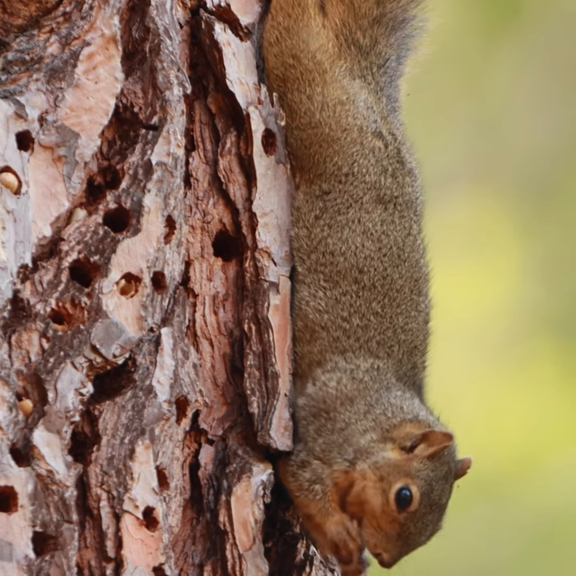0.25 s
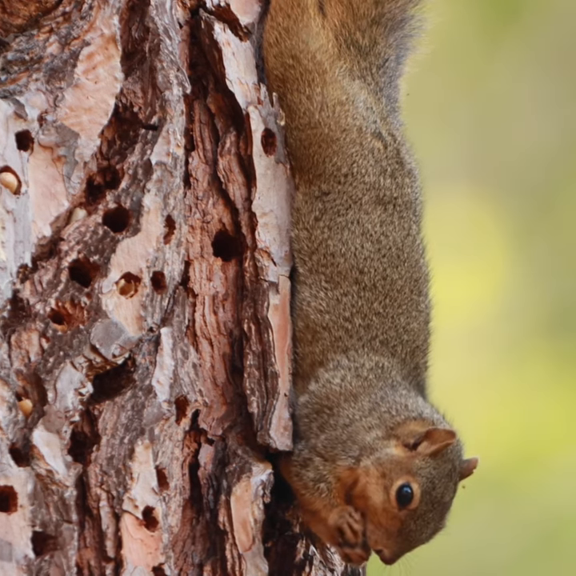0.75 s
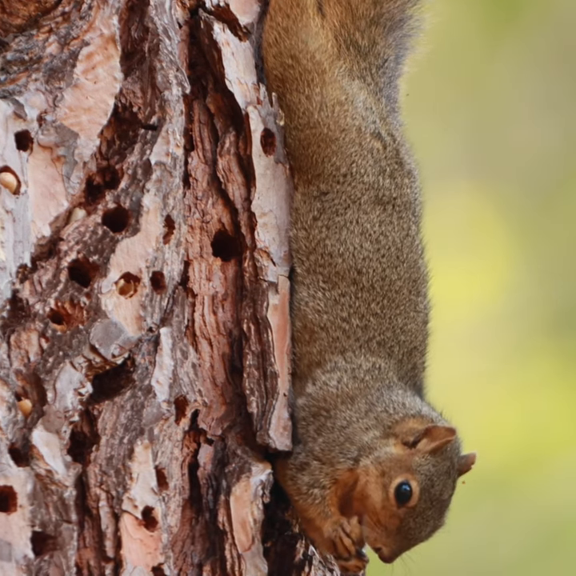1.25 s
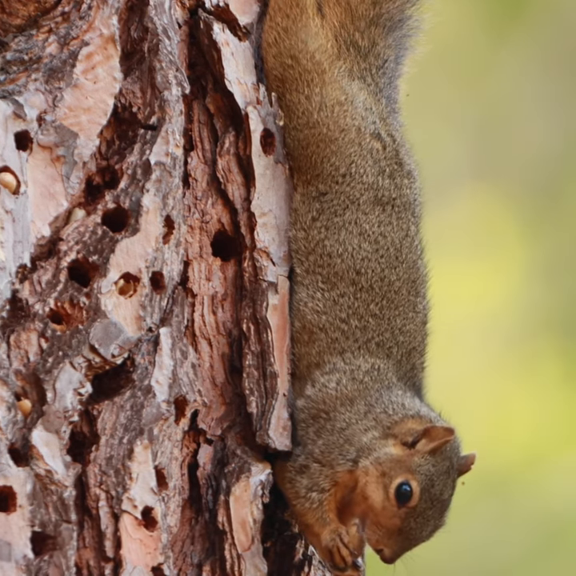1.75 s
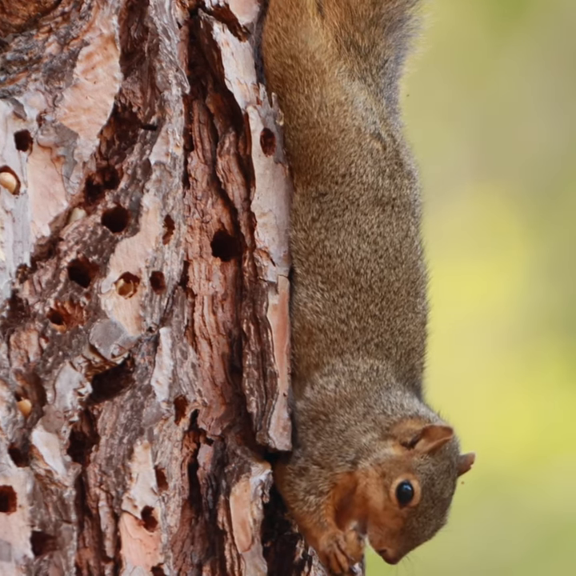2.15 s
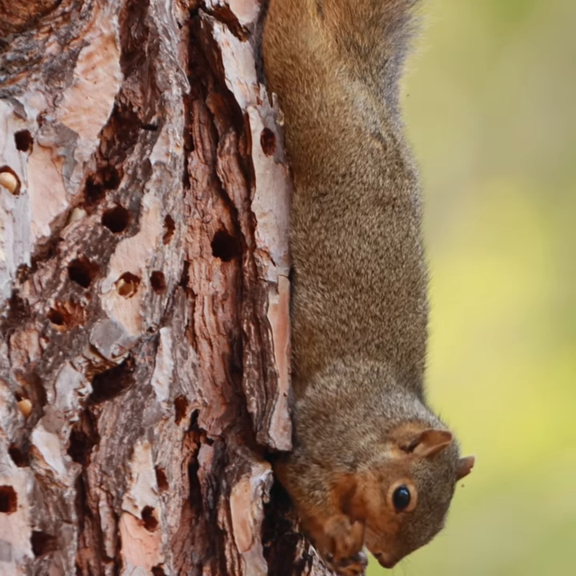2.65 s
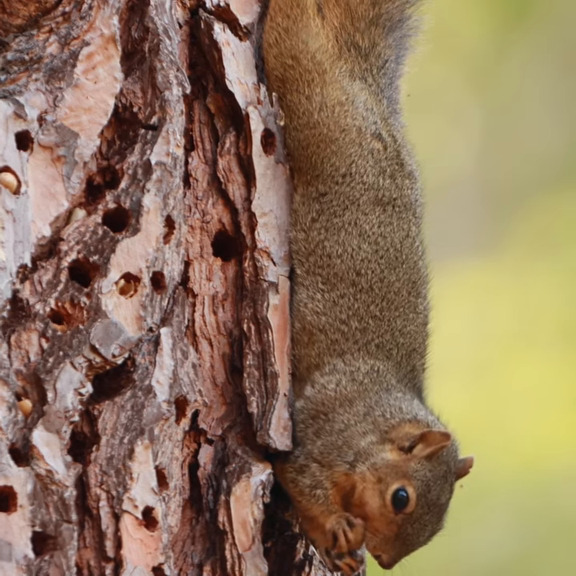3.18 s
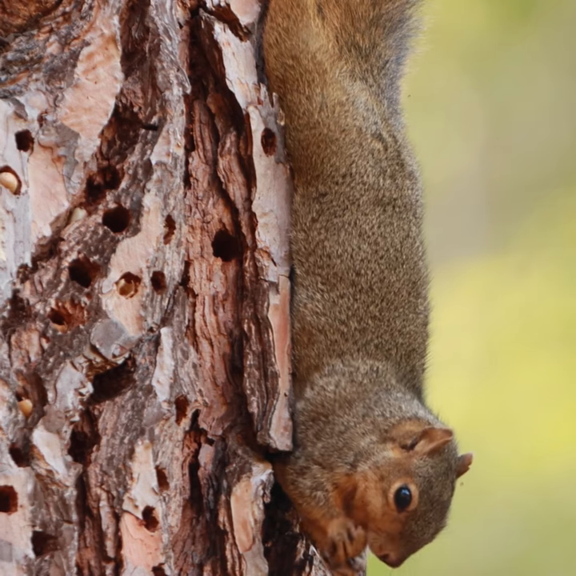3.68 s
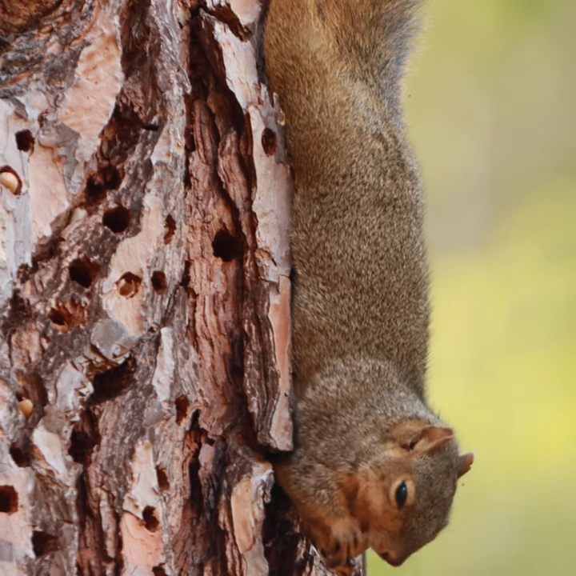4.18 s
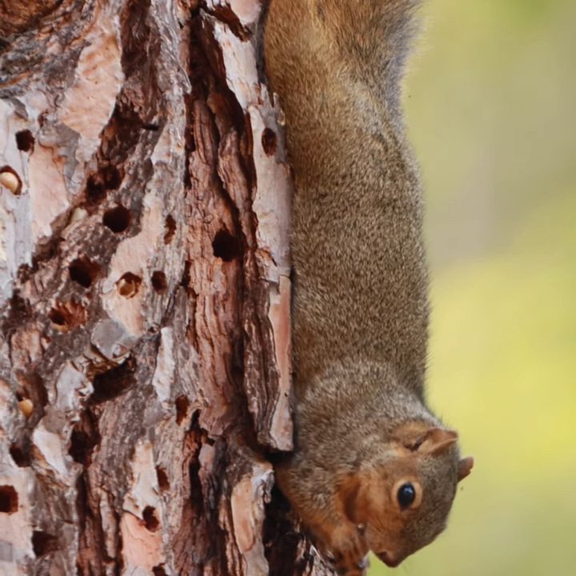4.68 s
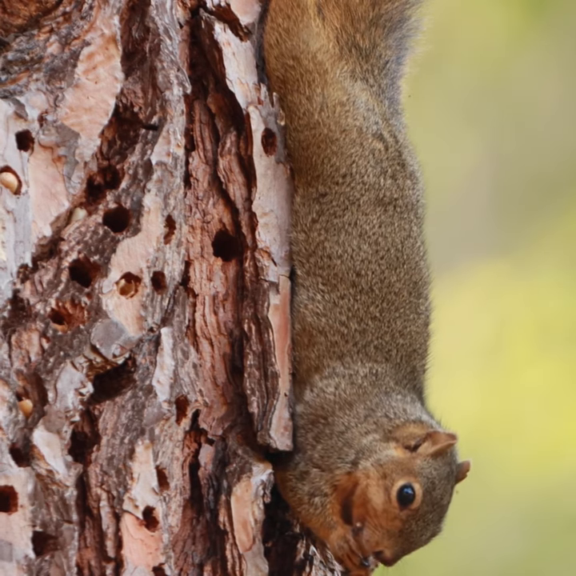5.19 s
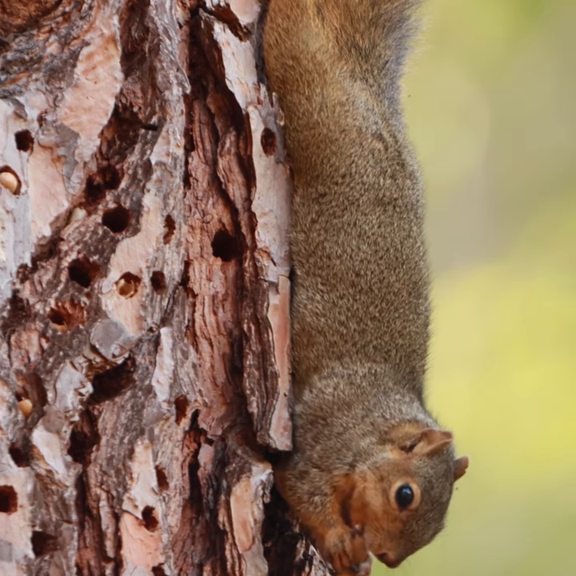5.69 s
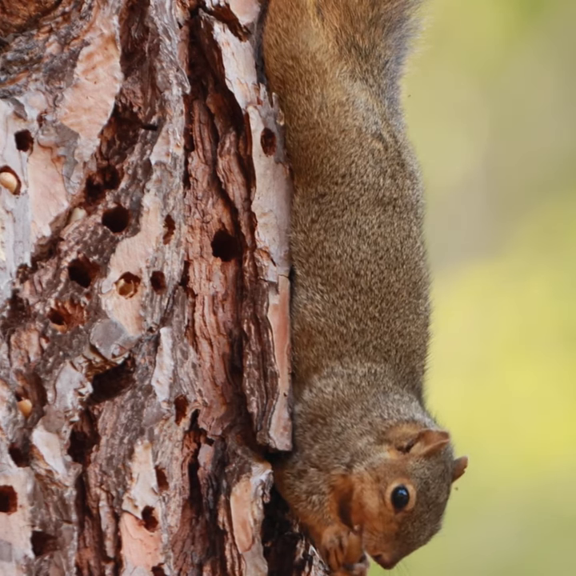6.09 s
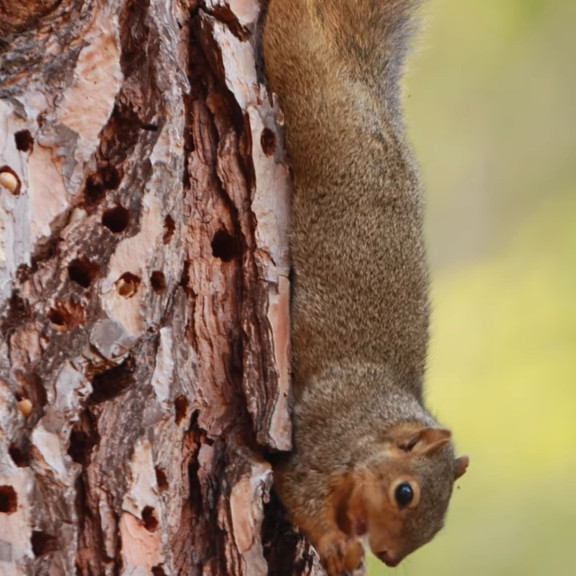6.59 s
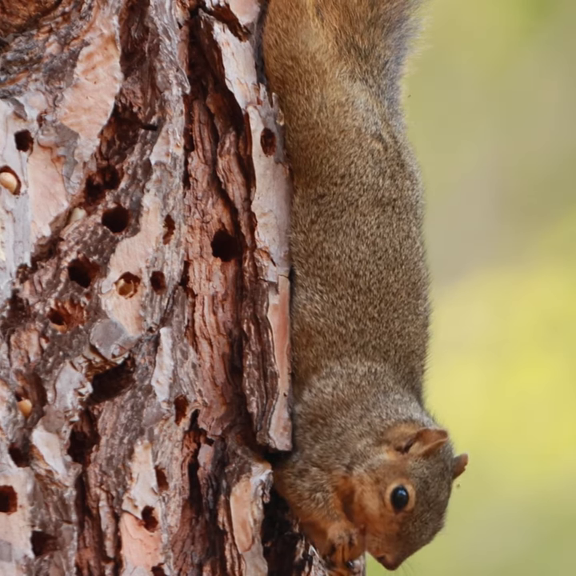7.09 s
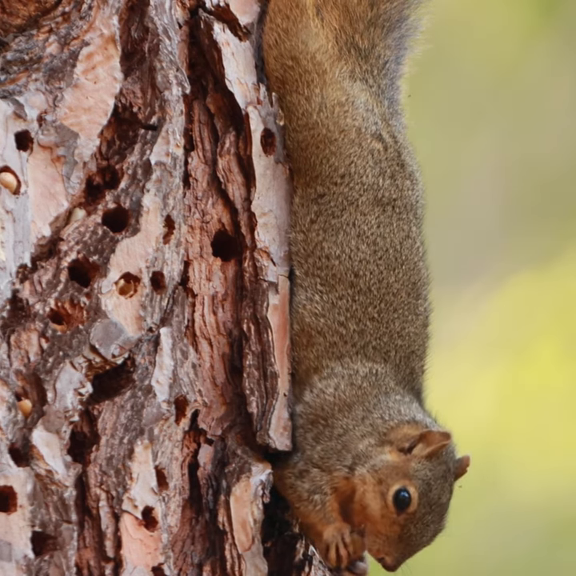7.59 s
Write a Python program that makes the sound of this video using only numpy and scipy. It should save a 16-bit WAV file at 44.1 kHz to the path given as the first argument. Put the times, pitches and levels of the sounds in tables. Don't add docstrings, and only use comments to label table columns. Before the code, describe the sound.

A nearby woodpecker gives five harsh rolling churrs among trees, with fainter churring from afar, a soft cricket chirp and low distant traffic rumble.

```python
import sys
import numpy as np
from scipy import signal
from scipy.fft import rfft, irfft, next_fast_len
from scipy.io import wavfile
from scipy.ndimage import uniform_filter1d

SR = 44100
rng = np.random.default_rng(int(sys.argv[2]) if len(sys.argv) > 2 else 0)


def store_wav(level_fs):
    pcm = np.round(np.clip(np.atleast_2d(level_fs), -1, 1) * 32767)
    wavfile.write(sys.argv[1], SR, pcm.T.astype(np.int16))


def volts_from_db(level):
    exponent = np.asarray(level, float) / 20
    return 10 ** exponent


N = 345744


def near_bird():
    # [opening note t/s, first roll t/s, last roll t/s, closing note t/s]
    call_times = [
        (3.378, 3.402, 3.652, 3.69),
        (4.609, 4.662, 4.882, 4.913),
        (5.038, 5.067, 5.177, 5.213),
        (5.337, 5.364, 5.476, 5.506),
        (6.766, 6.827, 7.072, 7.1),
    ]
    # [t/s, pitch f/Hz, level/dB]
    efforts = [
        [(3.378, 648, -44), (3.402, 580, -37.3), (3.457, 680, -33.3), (3.51, 725, -31.5), (3.57, 745, -28.5),
         (3.625, 700, -33), (3.69, 672, -40.6)],
        [(4.609, 580, -35.4), (4.662, 704, -30.6), (4.728, 918, -25), (4.8, 972, -24.4), (4.856, 972, -24.5),
         (4.913, 805, -29.5)],
        [(5.038, 636, -31.6), (5.067, 671, -31.3), (5.097, 775, -27.5), (5.125, 842, -27.9), (5.177, 805, -28),
         (5.213, 748, -30.9)],
        [(5.337, 644, -31.5), (5.364, 688, -30.1), (5.42, 800, -27.5), (5.476, 815, -27.8), (5.506, 770, -29.3)],
        [(6.766, 588, -34.7), (6.827, 735, -29.5), (6.912, 905, -29.3), (6.964, 965, -30), (7.016, 980, -29.5),
         (7.072, 750, -31), (7.1, 656, -39.5)],
    ]
    # [dip between rolls/dB, dip after opening/dB, swell/s]
    manners = [(-2.5, -1, .014), (-1.2, -5, .022), (-1, -8.5, .013), (-3.2, -5.5, .013), (-.6, -6.5, .019)]
    voices = [(5.5, .3, .75, .75, .72), (8.5, .05, .08, .13, .5), (8.5, .15, .08, .7, .05),
              (10, .08, .13, .08, .9), (12, 0, .08, .65, .2)]
    strains = [.05, .02, 0, .02, .17]
    # [first resonance/dB, second resonance f/Hz, its level/dB, treble/dB, left-right/dB]
    facings = [(10.5, 3530, 11.5, 8.5, -1), (10.5, 3525, 15.5, 6, -0.3), (11, 3550, 14, 5, 0),
               (9, 3540, 14.5, 10, 0), (13, 3510, 13.5, 2.5, -0.9)]
    # [f/Hz, level/dB]
    near_throat = [(900, -17.5), (1400, -1.5), (1800, -2), (2300, -1.5), (2800, 0), (3900, -10),
                   (4200, -13), (5600, -8.5), (7000, -15), (8400, -19.5), (9500, -37.5), (11800, -17),
                   (13200, -30.5), (14000, -42)]
    # [f/Hz, level/dB]
    leaves = [(1000, 12.5), (2200, 3.5), (3500, 8), (6000, 10), (12000, 6.5)]
    calls = []
    for times, effort, manner, voice, strain, facing in zip(call_times, efforts, manners, voices, strains, facings):
        rolls = near_rolls(times, effort, manner, voice, strain)
        calls.append(churr(rolls, near_throat, facing[:4], hiss_db=-64.0, lead_s=manner[2]))
    direct = sum(from_trees(call, facing[4]) for call, facing in zip(calls, facings))
    voiced = sum(calls)
    scatter = trees(voiced, t60_s=.2, level_db=-16, cut_hz=12000, gap_s=.008)
    tail = trees(coloured(voiced, leaves), t60_s=0.7, level_db=-18.5, cut_hz=8600, gap_s=0.0083)
    return volts_from_db(1.44) * direct + scatter + tail


def near_rolls(times, effort, manner, voice, strain):
    roll_s, haste = .0275, .52
    sag_growth, open_sag_pct, close_sag_pct = .4, 11, 4
    close_dip_db, pause_db_per_s = -6.5, -300
    clear = .03
    run_up_s, run_up_share, run_up_db = .02, .87, -5.5
    opening, first, last, closing = times
    dip_db, open_dip_db = manner[:2]
    sag_pct, slowing, open_rough, close_rough, carry = voice
    when, effort_hz, effort_db = np.transpose(effort)

    along = np.linspace(0, 1, round((last - first) / roll_s))
    even_hz = np.interp(first + along * (last - first), when, effort_hz)
    gaps = even_hz ** -haste * (1 + slowing * along)
    s = np.r_[opening, first, first + np.cumsum(gaps) / gaps.sum() * (last - first), closing]
    hz = np.interp(s, when, effort_hz)
    db = np.interp(s, when, effort_db)

    last_sag_pct = sag_pct * (1 + sag_growth / 2) * (1 - close_rough)
    sags_pct = np.r_[open_sag_pct, sag_pct * (1 + sag_growth * (along - .5)), last_sag_pct, close_sag_pct]
    pause_db = dip_db + pause_db_per_s * (closing - last - roll_s)
    dips_db = np.r_[open_dip_db, np.full(len(along), dip_db), pause_db, close_dip_db]
    sag_db = (db + np.append(db[1:], db[-1])) / 2 + dips_db
    k = np.arange(len(s))
    rough = clear + strain * (k / k[-1]) ** 2
    rough = rough + open_rough * carry ** k ** 2 + close_rough * carry ** k[::-1] ** 2
    rows = np.c_[s, hz, sags_pct, db, sag_db, rough]
    if first - opening > roll_s + run_up_s:
        run_db = db[1] + run_up_db
        rows[0, 4] = db[0] + open_dip_db
        run_up = (first - run_up_s, run_up_share * hz[1], 0, run_db, run_db, 2 * open_rough)
        rows = np.insert(rows, 1, run_up, axis=0)
    return rows


def churr(rolls, throat, opening, hiss_db, lead_s, fall_db=-17):
    s, hz, sag_pct, crest_db, sag_db, rough = np.transpose(rolls)
    sag_db = sag_db + .9 * np.minimum(sag_db - crest_db, 0)
    after = np.append(s[1:], s[-1] + .022)
    knots_s = np.r_[s[0] - lead_s, np.c_[s, (s + after) / 2].ravel(), after[-1]]
    low_hz = (hz + np.append(hz[1:], hz[-1])) / 2 * (1 - 1.25 * sag_pct / 100)
    knots_hz = np.r_[hz[0] * .82, np.c_[hz, low_hz].ravel(), low_hz[-1]]
    knots_db = np.r_[crest_db[0] + fall_db, np.c_[crest_db, sag_db].ravel(), sag_db[-1] + fall_db]
    start = int(knots_s[0] * SR)
    t = np.arange(start, int(knots_s[-1] * SR)) / SR
    knot = np.arange(len(knots_s))
    place = np.interp(t, knots_s, knot)
    eased = np.floor(place) + (1 - np.cos(np.pi * (place % 1))) / 2
    pitch_hz = np.interp(eased, knot, knots_hz)
    level_shape = 0.43
    level = np.interp(eased, knot, volts_from_db(knots_db / level_shape)) ** level_shape
    rough = np.clip(np.interp(t, s, rough), 0, 1)

    jitter = (.005 + .04 * rough) * drift(300, len(t))
    phase = 2 * np.pi * np.cumsum(pitch_hz * (1 + jitter)) / SR
    order = np.arange(1, 27)[:, None]
    harmonic_hz = order * pitch_hz
    treble = np.clip((harmonic_hz - 3900) / 800, 0, 1)
    upper = np.clip((harmonic_hz - 2400) / 500, 0, 1)
    climb = -.35 * upper + 0.33 * np.clip((harmonic_hz - 5000) / 3000, 0, 1)
    slid_hz = harmonic_hz * (pitch_hz / 850) ** climb
    opened = np.clip(place / 3 - .1, .25, 1)
    in_sag = (1 + np.cos(np.pi * place)) / 2
    heights_db = at_hz(throat, slid_hz) + opened * beak(slid_hz, *opening)
    heights_db = heights_db - 0.82 * in_sag * upper * (6.0 - treble) - 8.4 * (1 - opened) * treble
    heights = volts_from_db(heights_db) * (harmonic_hz < .36 * SR)
    flicker_db = np.minimum(.4 * order, 2.5) * np.array([drift(120, len(t)) for _ in order])

    wander_step = np.clip(harmonic_hz / 7e4 - .03, .04, .14) * treble
    wander = np.cumsum(wander_step * rng.standard_normal(treble.shape), axis=1)
    steady = (uniform_filter1d(level, size=1100, mode="constant") / level) ** treble
    waves = np.sin(order * phase + wander + rng.uniform(0, 2 * np.pi, order.shape))
    tone = (heights * volts_from_db(flicker_db) * steady * waves).sum(0)
    tone /= np.sqrt((heights ** 2).sum(0) / 2)

    grid_hz = np.geomspace(500, 15500, 60)
    colour = np.c_[grid_hz, at_hz(throat, grid_hz) + beak(grid_hz, *opening)]
    pulsed = rng.standard_normal(len(t)) * (1 + 0.87 * np.cos(phase))
    breath = rms_one(coloured(pulsed, colour))
    share = np.clip(rough + volts_from_db(hiss_db) ** 2, 0, 1)
    out = np.zeros(N)
    out[start:start + len(t)] = level * (np.sqrt(1 - share) * tone + np.sqrt(share) * breath)
    return out


def beak(hz, first_db, second_hz, second_db, treble_db):
    first = first_db * np.exp(-((hz - 2150) / 330) ** 2)
    second = second_db * np.exp(-((hz - second_hz) / 380) ** 2)
    return first + second + treble_db * np.clip((hz - 6000) / 4000, 0, 1)


def far_birds():
    # [first roll t/s, last roll t/s, top pitch f/Hz, top level/dB]
    trills = [
        (.818, 1.012, 848, -46.5),
        (1.773, 1.955, 890, -44),
        (3.012, 3.182, 897, -43.8),
        (4.25, 4.43, 915, -45.5),
    ]
    # [t/s, pitch f/Hz, level/dB]
    single_notes = [(1.055, 771, -47.5), (1.727, 671, -53.5), (2.962, 644, -50), (3.305, 760, -48),
                    (4.2, 690, -53), (2.068, 800, -47.5), (2.112, 769, -48.5), (2.16, 754, -59),
                    (3.222, 848, -52), (4.465, 843, -49), (4.531, 766, -46.5), (5.559, 886, -41),
                    (5.604, 850, -43.5), (5.696, 848, -45), (5.748, 788, -47), (5.835, 800, -54.5)]
    # [f/Hz, level/dB]
    far_throat = [(500, -43), (900, -22), (1600, -4), (2100, 0), (2650, -14.5), (3450, 1.5), (4200, -15),
                  (6000, -19), (15500, -71)]
    sag_pct, dip_db, rough = 15, -8, .08
    closed_beak = (0, 3400, 0, 0)
    voiced = 0
    for crests in [far_trill(*trill) for trill in trills] + [[note] for note in single_notes]:
        rolls = [(s, hz, sag_pct, db, db + dip_db, rough) for s, hz, db in crests]
        voiced = voiced + churr(rolls, far_throat, closed_beak, hiss_db=-16, lead_s=.018)
    scatter = trees(voiced, t60_s=.6, level_db=-9, cut_hz=5000, gap_s=.012)
    return volts_from_db(-2.0) * from_trees(voiced, -1.1) + scatter


def far_trill(first, last, top_hz, top_db):
    # [progress/0-1, share of top pitch, level under top/dB]
    arch = [(0, .85, -5.5), (.2, .94, -1.5), (.55, 1, 0), (.8, .97, -1), (1, .92, -2.5)]
    roll_s = .0365
    progress = np.linspace(0, 1, round((last - first) / roll_s) + 1)
    along, share, under_db = np.transpose(arch)
    s = first + progress * (last - first)
    hz = top_hz * np.interp(progress, along, share)
    return np.c_[s, hz, top_db + np.interp(progress, along, under_db)]


def from_trees(x, pan_db):
    # [f/Hz, left phase lead/rad, left-right/dB]
    bird_pair = [(800, -1.4, 1.5), (1250, 1, -2), (2400, -0.44, 3), (3860, -1.77, 4), (6500, -2, 2),
                 (9100, -5, 3), (15500, -6.5, -8)]
    hz, lead_rad, lean_db = np.transpose(bird_pair)
    grid_hz = np.fft.rfftfreq(N, 1 / SR)
    lean = volts_from_db((np.interp(grid_hz, hz, lean_db) + pan_db) / 2)
    left = lean * np.exp(1j * np.interp(grid_hz, hz, lead_rad))
    return irfft(rfft(x) * np.array([left, 1 / lean]), N)


def trees(x, t60_s, level_db, cut_hz, gap_s):
    t = np.arange(int(1.2 * SR)) / SR
    tail = rng.standard_normal((2, len(t))) * volts_from_db(-60 * t / t60_s) * np.clip(t / gap_s, 0, 1) ** 2
    tail = rms_one(signal.lfilter(*signal.butter(1, cut_hz, fs=SR), tail)) / np.sqrt(len(t))
    return volts_from_db(level_db) * signal.fftconvolve(x[None], tail, axes=1)[:, :N]


def cricket(pulse_s=.0135, every_s=.0212, hz=4030, rise_hz=8):
    # [first stroke t/s, peak level/dB]
    triples = [(0.367, -55.5), (0.6467, -54.5), (1.1165, -54.5), (1.3543, -55), (1.5905, -54.5),
               (1.8213, -54), (2.046, -52.5), (2.285, -53.5), (2.5232, -53.5), (2.766, -53.5), (4.498, -54),
               (5.7454, -53.5), (5.966, -52.5), (6.4038, -51.5)]
    # [first stroke t/s, peak level/dB]
    doubles = [(0.1201, -54), (0.893, -54), (5.558, -50), (6.179, -52.5)]
    out = np.zeros(N)
    t = np.arange(int(pulse_s * SR)) / SR
    shape = np.sin(np.pi * t / pulse_s) ** .3
    chirps = [(s, db, 0) for s, db in triples] + [(s, db, 1) for s, db in doubles]
    for s, db, first in chirps:
        for k in range(first, 3):
            at = int((s + (k - first) * every_s - .0015 + rng.normal(0, .0006)) * SR)
            size = len(t) * 4 // 5 if k == 0 else len(t)
            stroke = shape * np.sin(2 * np.pi * (hz + rise_hz * k + rng.normal(0, 25)) * t)
            out[at:at + size] += volts_from_db(db + 1.1 * (k - first)) * stroke[:size]
    scatter = trees(out, t60_s=.2, level_db=-18, cut_hz=8000, gap_s=.004)
    return volts_from_db(-1.0) * placed(out, 9.0, left_lag=11.2) + scatter


def small_hits():
    # [t/s, peak level/dB]
    knocks = [
        (0.959, -43),
        (6.246, -19.5),
        (7.539, -47),
    ]
    # [t/s, peak level/dB]
    ticks = [(4.0494, -51), (5.7274, -57), (6.0395, -38), (6.4694, -41), (6.61, -46), (7.454, -38)]
    knock = ring(ring(struck(knocks, -14.5, late_s=0.00122), 890, 0.003), 560, 0.0032)
    rounded = signal.lfilter(*signal.butter(2, 1300, fs=SR), np.gradient(knock) * -11)
    thud = ring(struck(knocks, -7.5, late_s=0.0023), 236, 0.011)
    clicks = struck(ticks, 1.5, late_s=0.00108)
    tick = ring(clicks, 3000, 0.0018) + volts_from_db(-12.0) * ring(clicks, 9100, 0.00076)
    return placed(rounded + thud, 2.5, left_lag=-5.0) + placed(tick, 3.0, left_lag=.3)


def struck(events, level_db, late_s):
    clicks = np.zeros(N)
    for s, db in events:
        clicks[int((s + late_s) * SR)] = volts_from_db(db + level_db)
    return clicks


def ring(x, hz, t60_s):
    r, w = volts_from_db(-60 / (t60_s * SR)), 2 * np.pi * hz / SR
    return signal.lfilter([0, np.sin(w)], [1, -2 * r * np.cos(w), r * r], x + 1e-18)


def placed(x, pan_db, left_lag):
    late = irfft(rfft(x) * np.exp(-2j * np.pi * np.fft.rfftfreq(len(x)) * left_lag), len(x))
    return np.array([late * volts_from_db(pan_db / 2), x * volts_from_db(-pan_db / 2)])


def background():
    # [f/Hz, density/dB per Hz]
    rumble_spectrum = [(12, -65), (20, -36), (38, -63), (52, -4.5), (72, 7), (110, 1.5), (145, -5),
                       (200, -41)]
    drone_spectrum = [(100, -6.5), (150, -5.5), (192, 7), (225, 2.5), (255, 2.5), (290, -7.5), (400, -53.5)]
    upper_spectrum = [(230, -13), (290, -6), (340, -2), (400, -11.5), (480, -20.5), (700, -51)]
    air_spectrum = [(240, -22), (400, -1), (452, -5.5), (488, -4), (674, -5), (785, -8.5), (930, -6.5),
                    (1050, -8), (1800, -7), (2230, -7), (2480, -10.5), (3320, -14.5), (5020, -21),
                    (15600, -35.5)]
    # [centre t/s, half width/s, change/dB]
    rumble_passes = [(5.8, 0.83, 4), (12, .07, 4), (7.4, 0.22, -4.5)]
    drone_passes = [(4.2, .2, -1.5), (5.5, 0.26, -4), (6.9, 1, -5.5), (7.84, 0.11, 2)]
    upper_passes = [(1.3, 0.67, 5.1), (4.75, .7, 10.6)]
    rumble_db = passing(-53, rumble_passes) + 1.5 * drift(6)
    drone_db = passing(-46.5, drone_passes) + 1.75 * drift(3.8)
    upper_db = passing(-58.5, upper_passes) + 0.61 * drift(6.1)
    air_db = -54.5 + 0.16 * drift(23)
    rumble = volts_from_db(rumble_db) * wide_noise(rumble_spectrum, left_lag=-12.0)
    drone = volts_from_db(drone_db) * wide_noise(drone_spectrum, left_lag=-10.5)
    upper = volts_from_db(upper_db) * wide_noise(upper_spectrum, left_lag=-8.0)
    air = volts_from_db(air_db) * wide_noise(air_spectrum, left_lag=7.47)
    return rumble + drone + upper + air


def passing(steady_db, passes):
    t = np.arange(N) / SR
    return steady_db + sum(db * np.exp(-((t - s) / half_s) ** 2) for s, half_s, db in passes)


def wide_noise(spectrum, left_lag):
    # [f/Hz, likeness/0-1, left-right/dB]
    capsule_pair = [(60, 0.92, 2.5), (201, 0.98, 3), (398, 0.68, 2.5), (800, 0.64, 3.5), (1800, 0.6, -1),
                    (4120, 0.17, 3.5), (9000, 0.1, 2.5)]
    hz = np.fft.rfftfreq(N, 1 / SR)
    mid, side = rfft(rng.standard_normal((2, N))) * volts_from_db(at_hz(spectrum, hz))
    alike = np.clip(at_hz(capsule_pair, hz), 0, 1)
    lean = volts_from_db(at_hz(capsule_pair, hz, column=2) / 2)
    mid, side = mid * np.sqrt(1 + alike), side * np.sqrt(1 - alike)
    left = (mid + side) * lean * np.exp(-2j * np.pi * hz * left_lag / SR)
    pair = irfft(np.array([left, (mid - side) / lean]), N)
    return pair / pair.mean(0).std()


def drift(rate_hz, size=N):
    r = np.exp(-2 * np.pi * rate_hz / SR)
    settle = 9000
    return rms_one(signal.lfilter([1], [1, -2 * r, r * r], rng.standard_normal(size + settle))[settle:])


def coloured(x, spectrum):
    size = next_fast_len(x.shape[-1])
    hz = np.fft.rfftfreq(size, 1 / SR)
    return irfft(rfft(x, size) * volts_from_db(at_hz(spectrum, hz)), size)[..., :x.shape[-1]]


def at_hz(points, hz, column=1):
    points = np.array(points)
    return np.interp(np.log(np.maximum(hz, 1)), np.log(points[:, 0]), points[:, column])


def rms_one(x):
    return x / np.sqrt(np.mean(x ** 2) + 1e-20)


def scene():
    return near_bird() + far_birds() + cricket() + small_hits() + background()


def low_pass(x):
    return signal.sosfilt(signal.butter(12, 15760, fs=SR, output="sos"), x)


def record(dry):
    mix = signal.sosfilt(signal.butter(3, 36, "high", fs=SR, output="sos"), dry)
    for notch_hz in (9920, 14880):
        mix = signal.lfilter(*signal.iirnotch(notch_hz, 60.0, SR), mix)
    return low_pass(mix)


dry = scene()
out = record(dry)
store_wav(out)
```